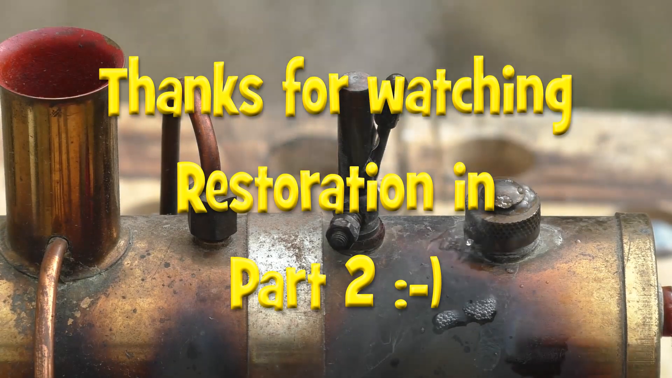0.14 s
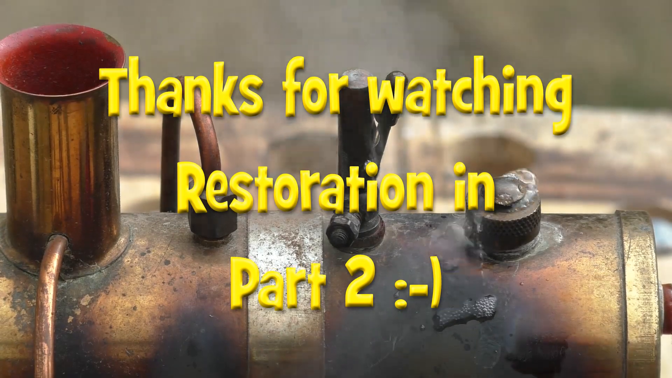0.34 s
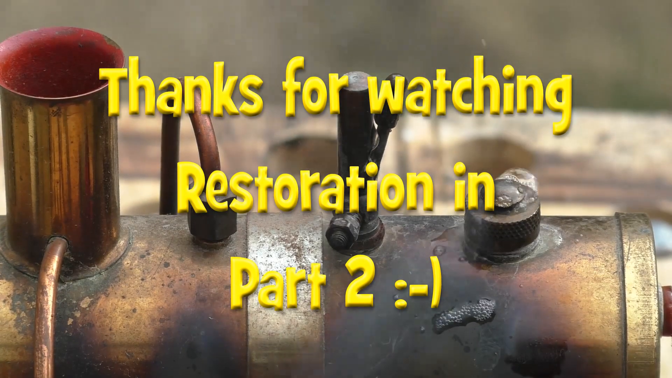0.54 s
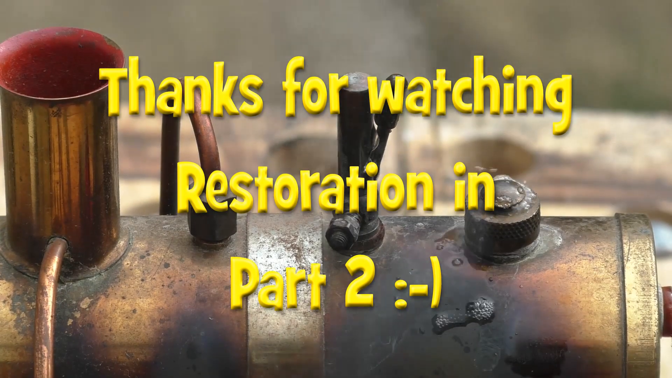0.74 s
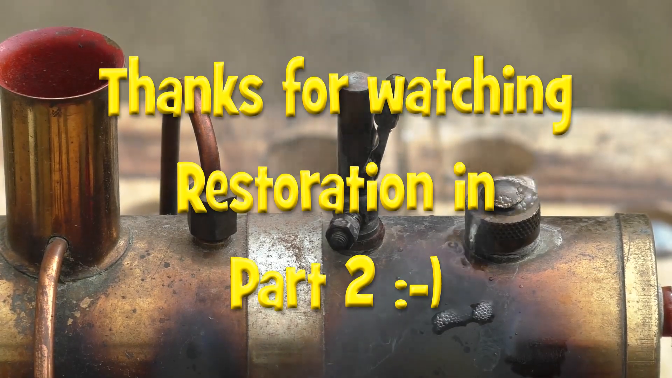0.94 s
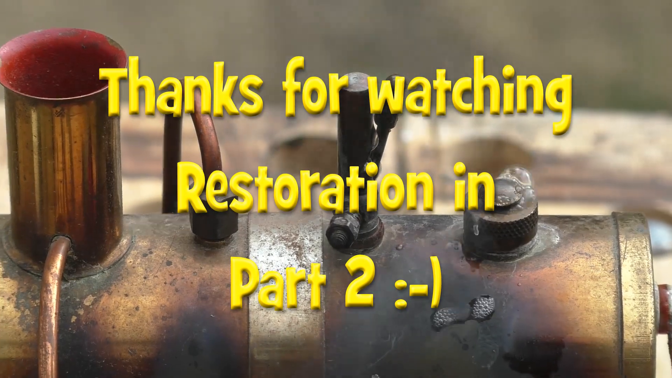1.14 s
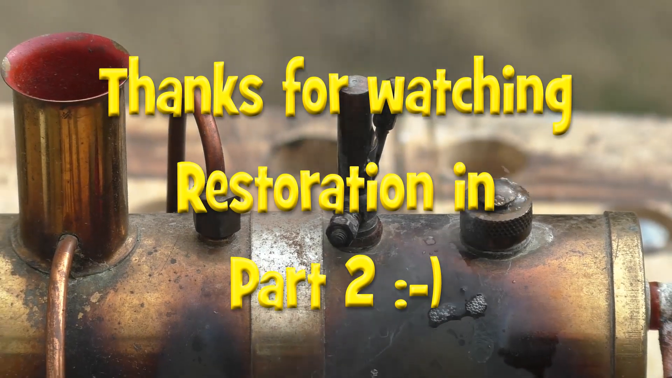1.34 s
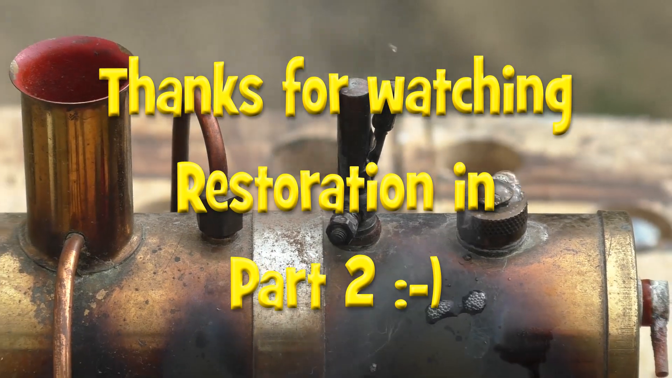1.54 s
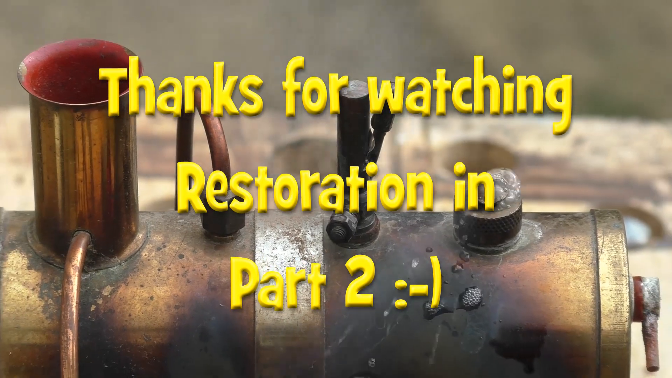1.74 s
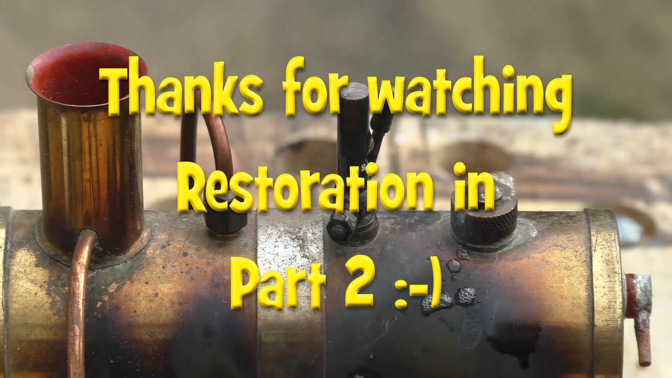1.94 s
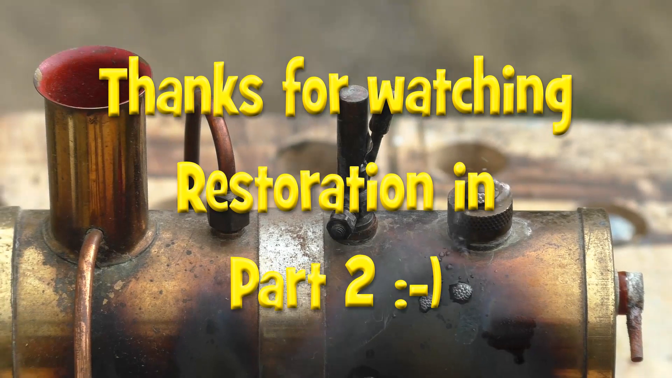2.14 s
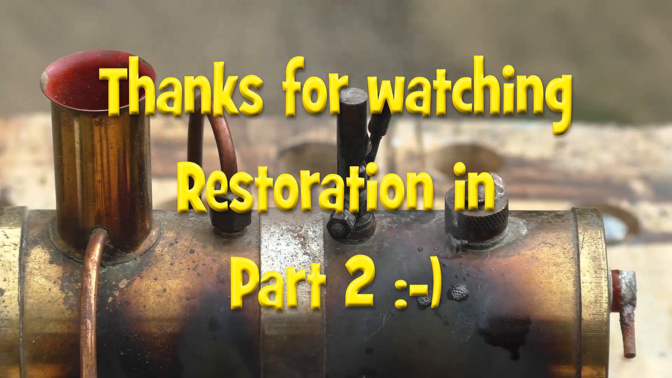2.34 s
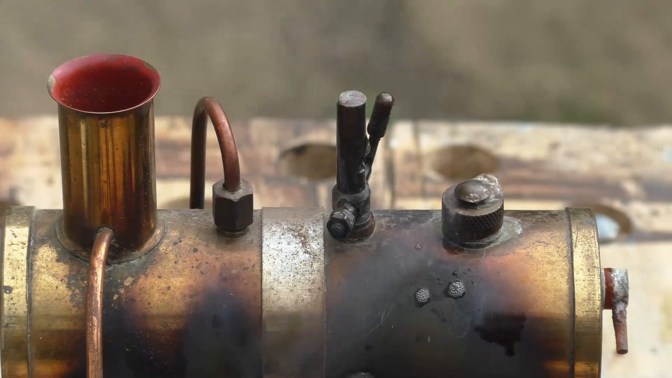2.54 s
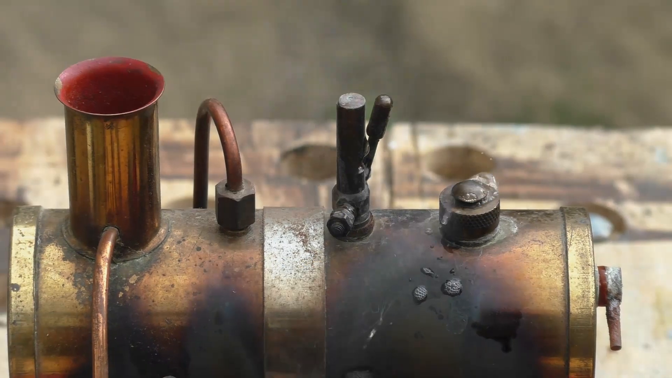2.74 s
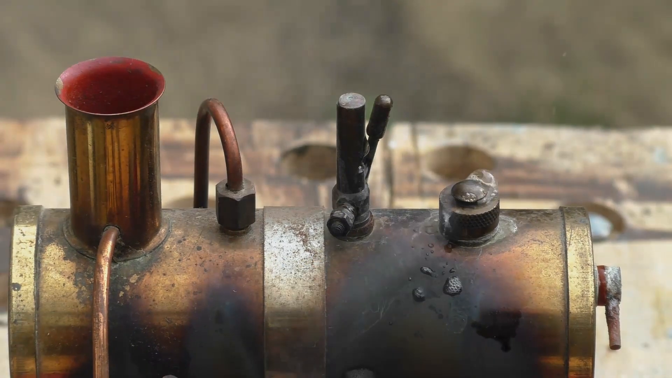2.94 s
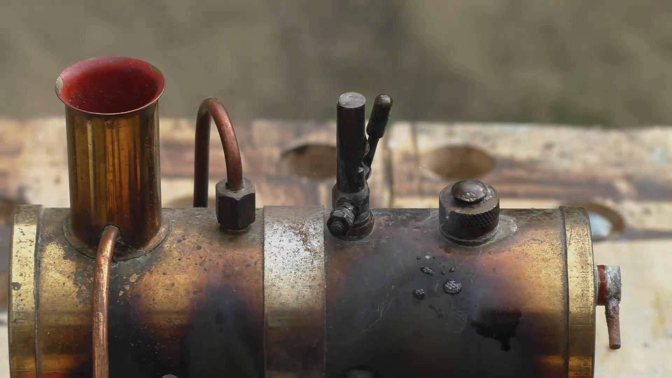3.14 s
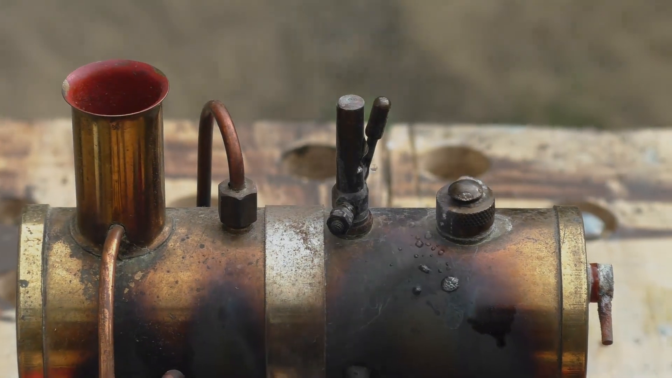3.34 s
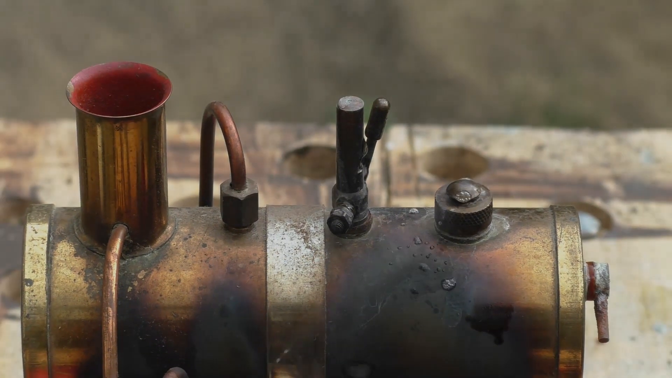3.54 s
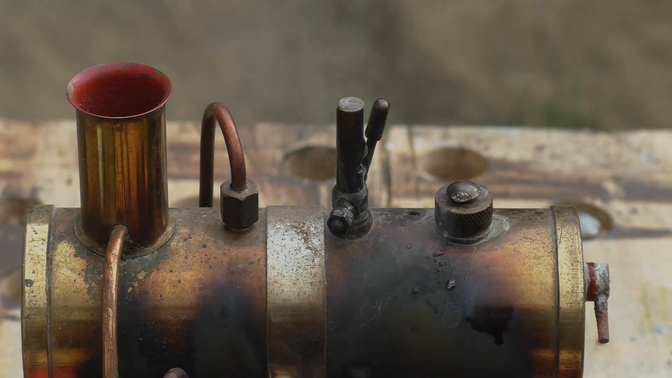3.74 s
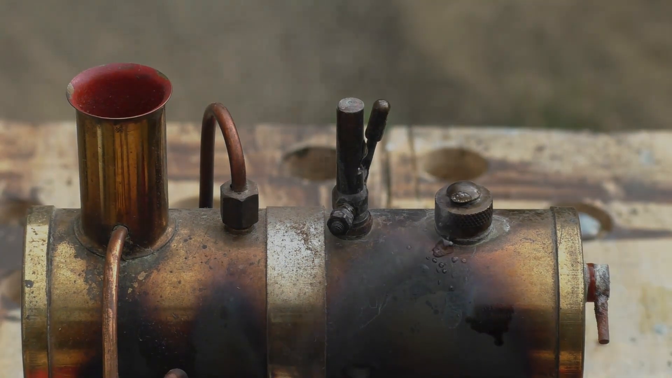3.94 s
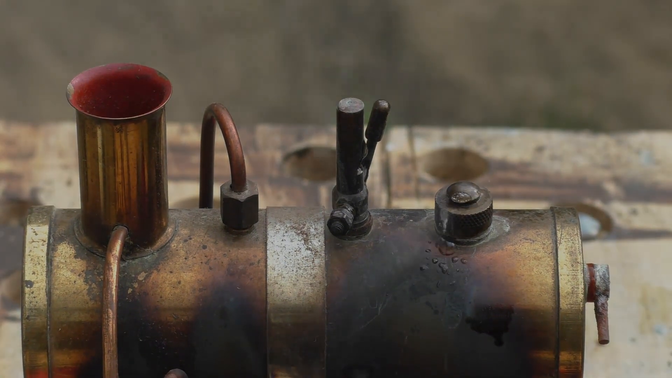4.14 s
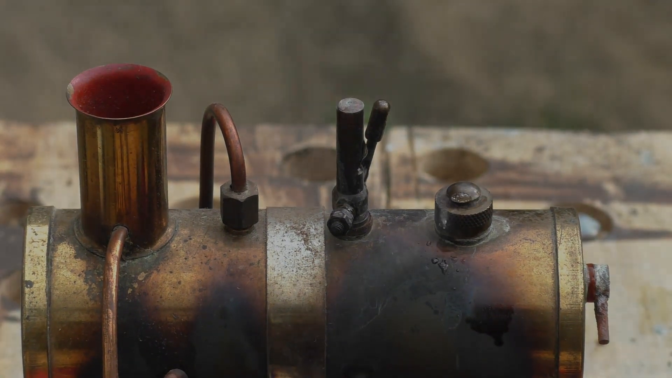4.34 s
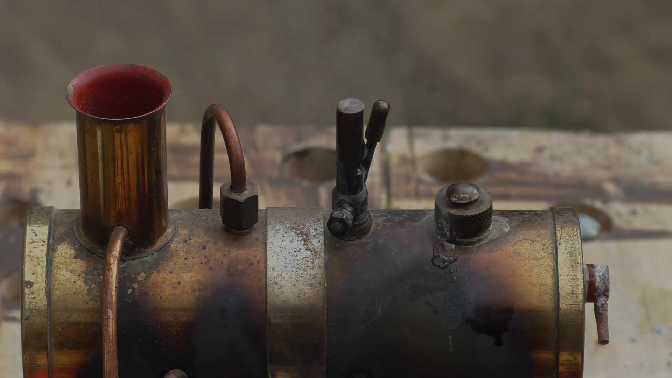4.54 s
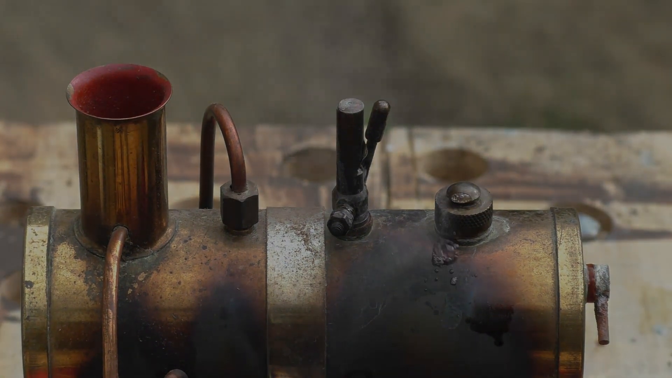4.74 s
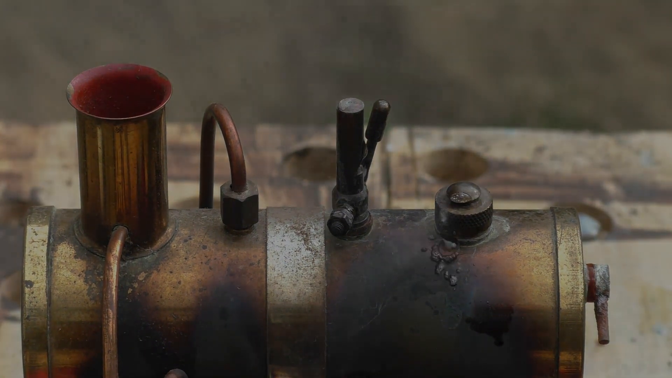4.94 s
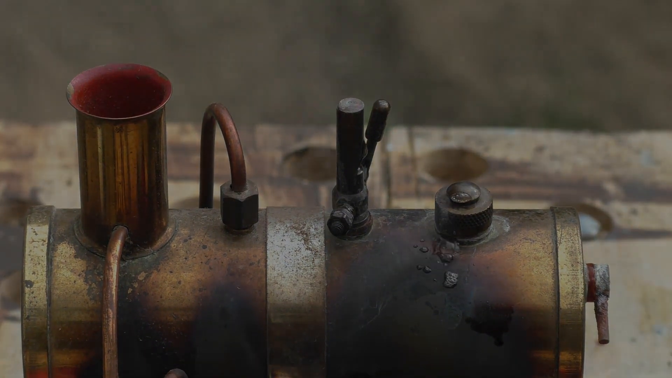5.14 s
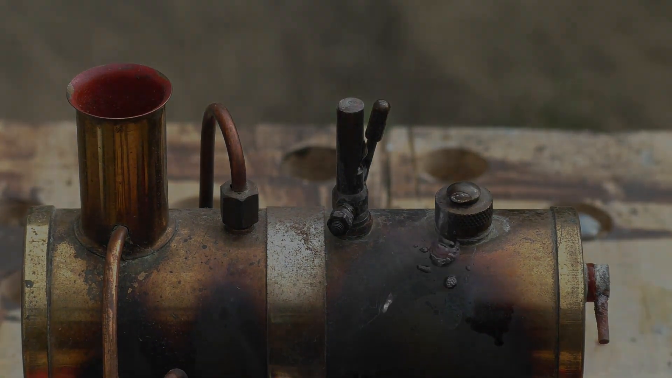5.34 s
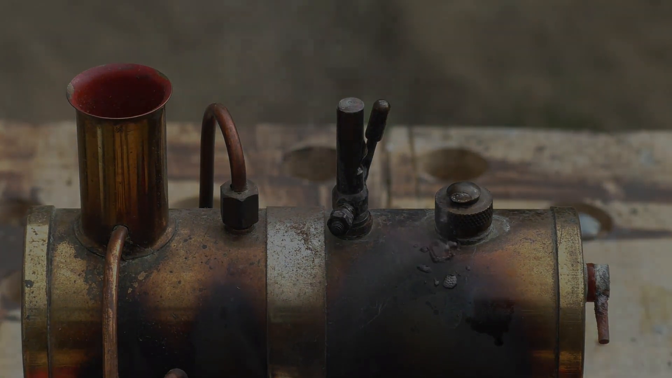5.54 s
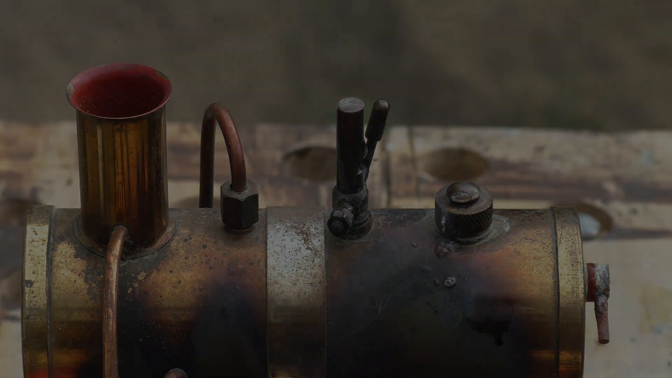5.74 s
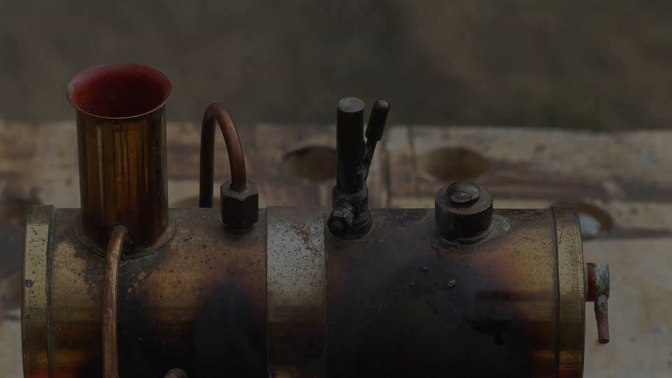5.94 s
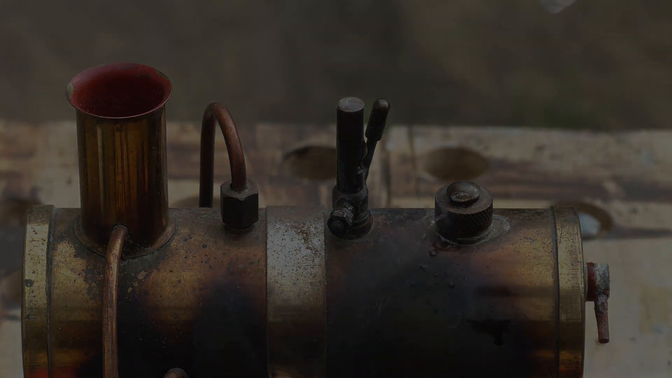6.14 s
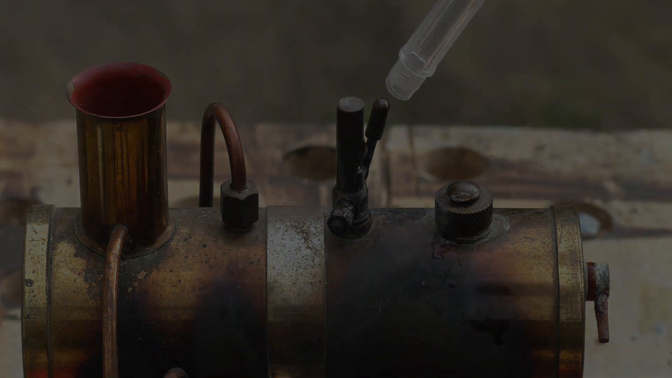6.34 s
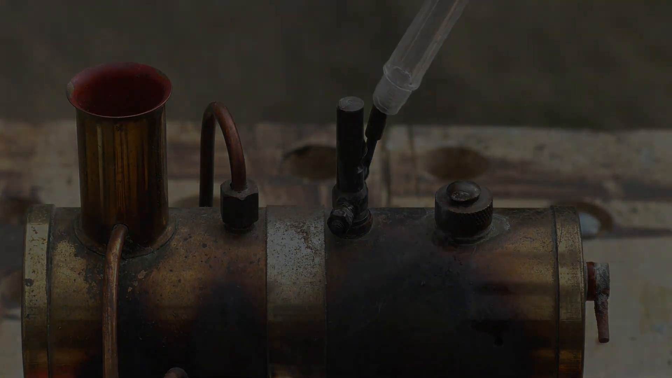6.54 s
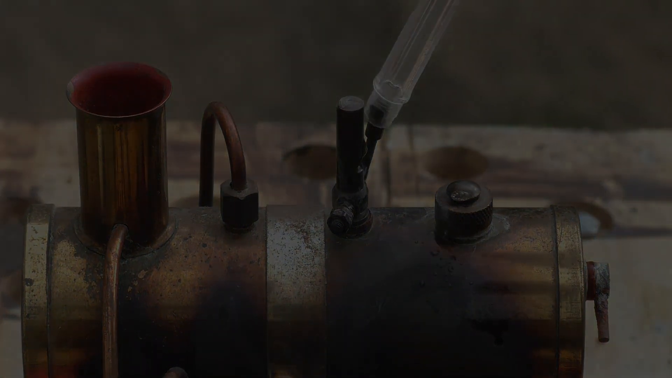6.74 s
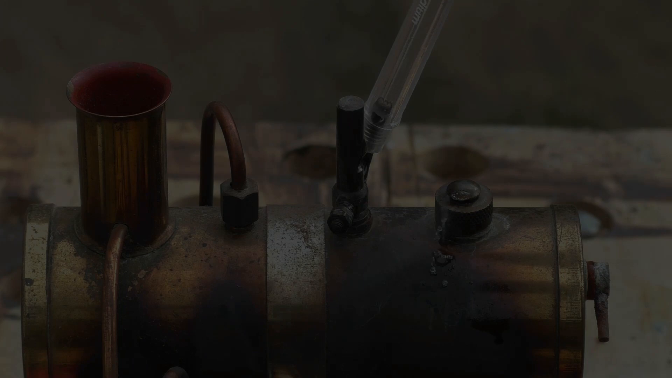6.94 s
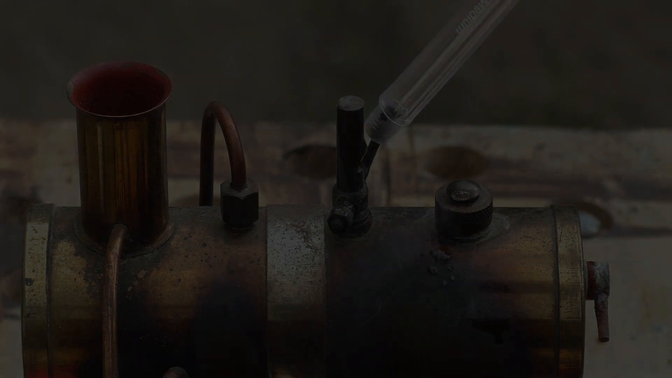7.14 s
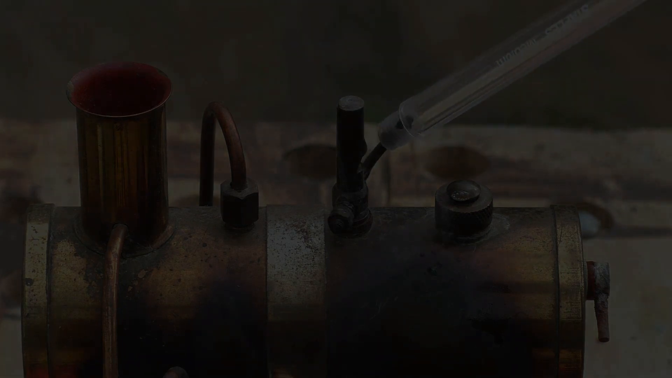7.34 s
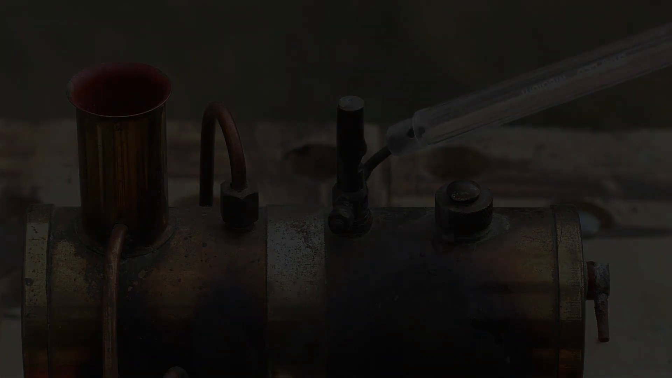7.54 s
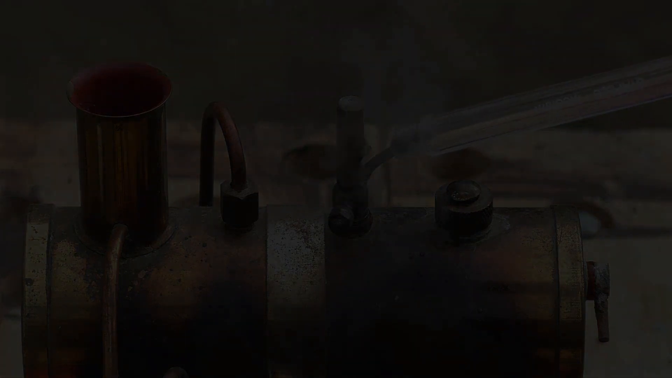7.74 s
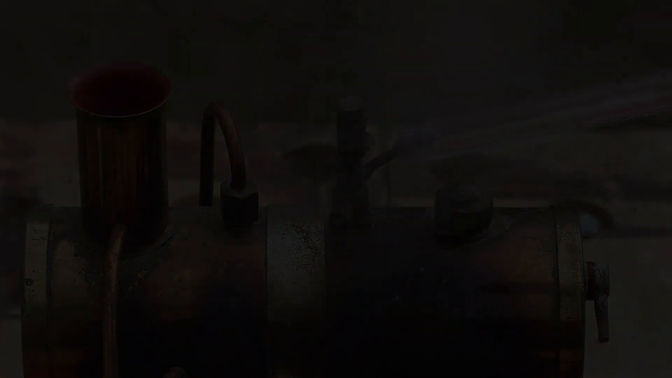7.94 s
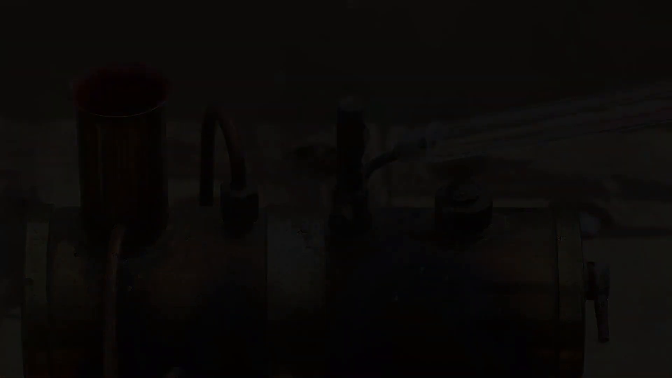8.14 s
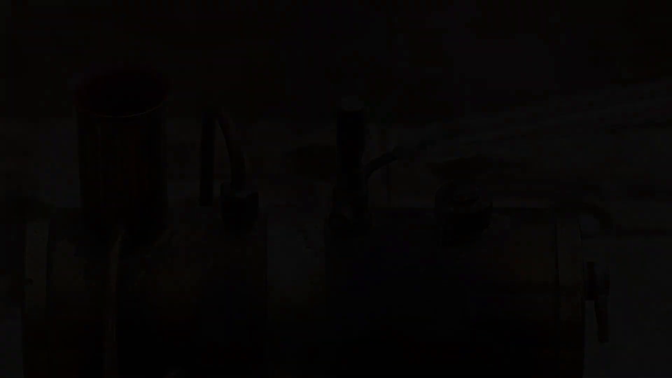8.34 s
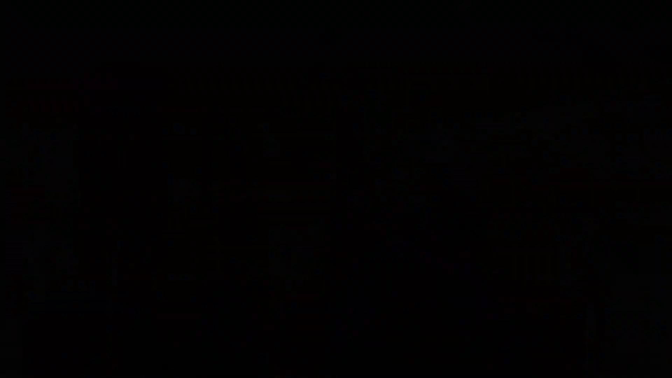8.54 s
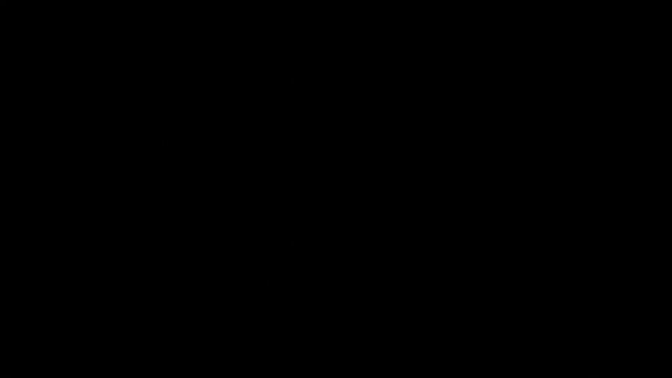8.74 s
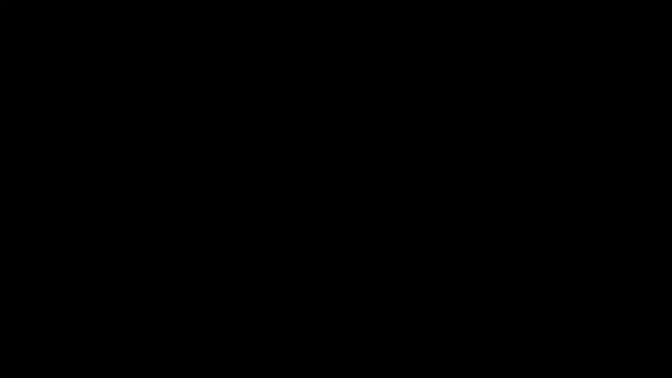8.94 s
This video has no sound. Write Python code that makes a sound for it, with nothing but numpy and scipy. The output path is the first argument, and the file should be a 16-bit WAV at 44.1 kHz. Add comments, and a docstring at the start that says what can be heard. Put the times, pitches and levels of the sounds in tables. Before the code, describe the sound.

Steam leaks from a toy boiler's filler cap with a steady, wet, spitting hiss, heard close over a faint low workshop rumble. Past the middle, a sleeve rustles softly, the hiss changes colour as a hand comes near, and a pen ticks and slips on a small lever. Near the end the valve spurts and a tiny steam whistle starts breathy, then holds one shrill, slightly wavering note while the hiss recedes.

```python
"""A wet, spitting hiss comes first: steam leaks at a toy boiler's filler cap, over a low workshop rumble.
A hand rustles near and colours the hiss by reflection; its pen ticks and slips on the whistle lever.
The valve spurts open and the pipe, breathy at first, oscillates on a shrill note shaken by turbulence.
An automatic gain control turns the whole sound down as the note grows, so the hiss recedes."""
import sys
import numpy as np
from scipy import signal
from scipy.fft import rfft, irfft, next_fast_len
from scipy.io import wavfile
from scipy.ndimage import uniform_filter1d

SR = 44100
rng = np.random.default_rng(int(sys.argv[2]) if len(sys.argv) > 2 else 0)


def generate_wav(sig):
    """Save sig (samples, or channels by samples) to the path in sys.argv[1] as 16-bit PCM at SR."""
    pcm = np.round(np.clip(np.atleast_2d(sig).T, -1, 1) * 32767).astype(np.int16)
    wavfile.write(sys.argv[1], SR, pcm)


N = 400412
SIZE, HOP = 1024, 512
TIME = np.arange(N) / SR
FRAME_S = np.arange(N // HOP + 5) * HOP / SR
BIN_HZ = np.fft.rfftfreq(SIZE, 1 / SR)

# stereo width: (frequency [Hz], side minus mid [dB])
STEREO_WIDTH = [(30, -15), (180, -19.5), (700, -25), (1400, -33.5), (2800, -73), (6000, -41), (6500, -3.5),
                (7500, -7.5), (9500, -5), (15000, -5)]
# stereo lean: (frequency [Hz], left minus right [dB])
STEREO_LEAN = [(6100, 0), (7200, -2), (8600, -1.5), (9600, 0), (13000, 2), (15500, 2)]
# spectrum of the leak: (frequency [Hz], relative level [dB])
LEAK_SPECTRUM = [(88, -64), (150, -22), (193, -7), (308, -14.5), (453, -9), (1290, -7.5), (1400, -8),
                 (1760, -3), (2450, -2.5), (5030, -3), (5650, -2), (7410, -6.5), (8490, -1.5),
                 (11100, -0.5), (15500, -5)]
# resonances of the cap and fittings: (frequency [Hz], width [Hz], gain [dB])
FITTING_MODES = [(189, 93, 4.5), (435, 37, 4.5), (633, 340, 3), (1402, 55, 8.5), (2135, 200, 5),
                 (2466, 43, 3.5), (3010, 51, 5), (3540, 36, 5.5), (3800, 39, 6), (4260, 69, 10),
                 (4733, 180, 4.5), (5446, 66, 10.5), (5640, 66, 7.5), (5850, 76, 8), (6750, 83, 5),
                 (6900, 60, 1), (7250, 76, 6), (8670, 1330, 3.5), (11080, 1100, 3), (13500, 860, 5),
                 (14800, 700, 5)]
# interference with the bench reflection: (frequency [Hz], width [Hz], gain [dB])
BENCH_NOTCHES = [(305, 96, -1), (857, 60, -2.5), (1270, 260, -3), (1756, 61, -11.5), (2695, 230, -1.5),
                 (3496, 96, -3), (4840, 98, -5.5), (6120, 170, 1), (6650, 104, -8.5), (7730, 600, -2.5),
                 (12400, 530, -2.5)]
# resonant colour of the hiss: (frequency [Hz], width [Hz], gain under the cupped hand [dB])
HISS_RESONANCES = [(400, 330, 1), (1680, 500, 2), (2144, 270, -7.5), (2628, 440, 8.5), (4000, 250, 3.5),
                   (4920, 650, 2), (5500, 500, -2.5), (6760, 710, 5), (7950, 620, 4), (12200, 1100, 3.5)]
# water chokes the leak, then blows clear: (time [s], depth [dB])
WATER_CHOKES = [(2.55, 2.8), (3.02, 0.7), (3.49, 0.3), (3.8, 0.2), (4.29, 0.7), (4.7, 0.5), (5.12, 2),
                (5.43, 1), (5.78, -0.6), (6.23, 1), (7.4, 0.5), (7.7, 1.7)]
# bubbles excite a cap resonance: (time [s], gain [dB])
BUBBLE_SPUTTERS = [(2.43, 4.5), (3.05, 4), (4.02, 1), (4.55, 2.5), (5.14, 5.5)]
# low workshop noise: (frequency [Hz], relative level [dB])
RUMBLE_SPECTRUM = [(20, -24), (40, -21), (65, -7), (100, 1), (140, -17), (250, -12), (600, -43)]
# reflection off the hand: (time [s], extra path [m])
ECHO_PATH = [(5.3, .65), (5.85, .41), (6.02, .275), (6.28, .2), (6.58, .189), (7.3, .207), (7.8, .211)]
# spectrum of the sleeve: (frequency [Hz], relative level [dB])
RUSTLE_SPECTRUM = [(100, -32), (220, -3), (380, 3.5), (650, 1.5), (1100, -1), (1400, -11), (2500, -10),
                   (8000, -24)]
# hand and sleeve movements: (time [s], level [dB], duration [s])
SLEEVE_MOVES = [(5.55, -45, 0.2), (5.79, -43, 0.19), (6.21, -32.5, 0.067), (6.36, -41.5, 0.68),
                (6.93, -40, 0.46), (7.5, -47.5, 0.94)]
# hand bumps and pen ticks: (time [s], level [dB], frequency [Hz], 60 dB decay time [s])
IMPACTS = [(5.784, -30, 270, 0.055), (6.175, -20.5, 2120, .015), (6.196, -25, 420, 0.024),
           (6.207, -34, 1950, .015), (6.217, -21, 1910, 0.029), (6.225, -29, 424, 0.016),
           (6.721, -20, 1440, 0.019), (6.738, -17, 2730, 0.011)]
# resonances of the pen barrel: (frequency [Hz], width [Hz], relative level [dB])
PEN_MODES = [(1180, 170, -2), (1870, 290, -3), (3200, 390, -1), (4550, 820, 3), (6100, 570, 1)]
# the pen slips on the lever: (time [s], level [dB], duration [s])
PEN_SLIPS = [(6.172, -28.5, .025), (6.215, -26.5, 0.064), (6.724, -32, .04)]
# steam through the valve, which seeps, cracks and opens: (time [s], level [dB])
VALVE_FLOW = [(6.9, -52), (7.55, -33.5), (7.74, -29.5), (7.8, -24), (7.93, -15.5), (9.08, -10.5)]
# whistle body resonances: (frequency [Hz], width [Hz], level barely open [dB], level fully open [dB])
BODY_MODES = [(450, 670, -22.5, -18), (930, 440, -25, -18), (1570, 350, -18, -12.5), (2550, 820, -7, -7.5),
              (3720, 350, -4.5, -5), (4910, 670, 0.5, 1), (5550, 700, -6, -8), (8350, 1400, -9, -1),
              (10400, 860, -11, -4), (12500, 1300, -14, -5.5), (15000, 1200, -11, -8)]
# spurts from the valve: (time [s], level [dB], duration [s])
VALVE_PUFFS = [(7.645, -30, .05), (7.80, -20.5, 0.04), (7.91, -23, 0.045)]
# the note scoops up as it takes hold: (time [s], frequency [Hz])
NOTE_PITCH = [(7.9, 6200), (8.06, 6275), (8.13, 6420), (8.22, 6515), (8.49, 6415), (8.56, 6495),
              (8.75, 6460), (9.02, 6490), (9.08, 6590)]

# the hand comes into reach, then the palm closes over the boiler: (start [s], duration [s])
REACH, CUP = (5.25, 0.58), (6.12, 1)
# the pipe starts to resound, then the note takes hold: (start [s], duration [s])
RESOUND, TAKE_HOLD = (7.73, 0.31), (7.92, 0.23)


def gain_of(db):
    """Amplitude ratio of a level in decibels."""
    return 10 ** (np.asarray(db) / 20)


def unit_rms(x):
    """Normalisation to an rms of one."""
    return x / np.sqrt(np.mean(x ** 2) + 1e-20)


def unit_power(shape):
    """Normalisation of a filter so that white noise keeps its power."""
    return shape / np.sqrt(np.mean(shape ** 2, -1, keepdims=True))


def curve(rows, t):
    """Linear interpolation of a table at the times t."""
    return np.interp(t, *np.transpose(rows))


def spectrum(rows):
    """Interpolation of a table onto the bins, along log frequency."""
    hz, db = np.transpose(rows)
    return np.interp(np.log(BIN_HZ + 1), np.log(hz), db)


def bell(hz, width):
    """Resonance curve of height one."""
    return 1 / (1 + ((BIN_HZ - hz) / (0.71 * width)) ** 2) ** 2


def response_db(modes):
    """Filters in series: their peaks and dips add in decibels."""
    return sum(db * bell(hz, width) for hz, width, db in modes)


def ramp(t, start, length):
    """Linear transition from 0 to 1."""
    return np.clip((t - start) / length, 0, 1)


def swell(t, peak, rise, fall):
    """Asymmetric Gaussian envelope of height one."""
    return np.exp(-((t - peak) / np.where(t < peak, rise, fall)) ** 2)


def strokes(rows):
    """Incoherent addition: strokes that rise quickly and die more slowly sum in power."""
    envelopes = (gain_of(db) * swell(TIME, s, .3 * length, .7 * length) for s, db, length in rows)
    return np.sqrt(sum(envelope ** 2 for envelope in envelopes))


def wander(rate_hz, count=N, step=1 / SR):
    """Random fluctuation of rms one, low-passed at rate_hz."""
    size = next_fast_len(count)
    hz = np.fft.rfftfreq(size, step)
    smoothed = rfft(rng.standard_normal(size)) / (1 + (hz / rate_hz) ** 2)
    return unit_rms(irfft(smoothed, size)[:count])


def noise(gains, spit=0., clicks_per_s=900):
    """Source and filter: stereo noise, with clicks of relative rms spit, is shaped bin by bin."""
    count = (len(FRAME_S) - 1) * HOP
    white = rng.standard_normal((2, count))
    if spit:
        sizes = gain_of(4 * np.minimum(rng.exponential(1, count), 3))
        clicks = sizes * (rng.random(count) < clicks_per_s / SR)
        white = unit_rms(white + spit * unit_rms(clicks * np.sign(white)))
    mid, side = signal.stft(white, nperseg=SIZE, noverlap=SIZE - HOP)[2].transpose(0, 2, 1)
    side = side * gain_of(spectrum(STEREO_WIDTH))
    lean = gain_of(spectrum(STEREO_LEAN) / 2)
    frames = np.array([(mid + side) * lean, (mid - side) / lean]) * gains
    return signal.istft(frames.transpose(0, 2, 1), nperseg=SIZE, noverlap=SIZE - HOP)[1][:, :N]


def room(x, t60=0.3):
    """Reverberation: sparse reflections, independent in each channel, decay exponentially."""
    t = np.arange(SR // 2) / SR
    taps = rng.standard_normal((2, len(t))) * (rng.random((2, len(t))) < 2500 / SR)
    taps *= gain_of(-60 * t / t60) * (t > .002)
    taps /= np.linalg.norm(taps, axis=1, keepdims=True)
    return signal.fftconvolve(x[None], taps, axes=1)[:, :N]


def leak_drive_db(sag_db_per_s=0.22, surge_db=2.8):
    """Jet strength follows pressure: a slow sag, chokes of water and one surge."""
    choked_db = sum(db * swell(FRAME_S, s, rise=0.12, fall=0.07) for s, db in WATER_CHOKES)
    surge = swell(FRAME_S, 6.98, rise=0.37, fall=0.19)
    return -23.5 - sag_db_per_s * FRAME_S - choked_db + surge_db * surge


def leak(ripple_db=1.1, flicker_db=0.64, patchy_db=0.9, sputter_db=1.3):
    """Turbulent jet noise: wet steam excites the cap's resonances; its treble follows pressure most."""
    walls_db = ripple_db * unit_rms(rng.standard_normal(len(BIN_HZ))) / (1 + (BIN_HZ / 9000) ** 2)
    colour_db = spectrum(LEAK_SPECTRUM) + response_db(FITTING_MODES + BENCH_NOTCHES) + walls_db
    low_db, high_db = [sputter_db * wander(19, len(FRAME_S), HOP / SR) for _ in range(2)]
    low_db += sum(db * swell(FRAME_S, s, rise=0.06, fall=0.06) for s, db in BUBBLE_SPUTTERS)
    cap_db = np.outer(low_db, bell(2320, 500)) + np.outer(high_db, bell(4090, 420))
    drive_db = leak_drive_db()
    swing_db = drive_db - drive_db.mean() + flicker_db * wander(9.3, len(FRAME_S), HOP / SR)
    treble_share = np.interp(BIN_HZ, [2000, 9000], [0.079, 1])
    patches = rng.standard_normal((len(FRAME_S), len(BIN_HZ)))  # water keeps changing the jet
    patches = unit_rms(uniform_filter1d(uniform_filter1d(patches, size=13, axis=0), size=36, axis=1))
    unsteady_db = treble_share * (swing_db[:, None] + patchy_db * patches)
    level_db = drive_db.mean() + cap_db + resonant_colour_db() + unsteady_db
    return noise(unit_power(gain_of(colour_db)) * gain_of(level_db) * hand_reflection(), spit=0.36)


def resonant_colour_db(start_share=0.46, palm_db=4.5):
    """Resonance: the hiss's colour grows stronger as the hand cups over it; the palm adds a mode."""
    cupped = ramp(FRAME_S, *CUP)[:, None]
    share = start_share + (1 - start_share) * cupped
    return share * response_db(HISS_RESONANCES) + cupped ** 2 * palm_db * bell(2430, 190)


def workshop(rumble_db=-56, hum_db=-57, hum_hz=106.6, sag_hz_per_s=4, peak_s=2.5):
    """Slow modulation: a rumble heaves unevenly; a faint hum swells and fades as its pitch sinks."""
    hz = hum_hz - sag_hz_per_s * (TIME - peak_s) + 1.37 * wander(8.6)
    envelope = np.sqrt(2) * gain_of(hum_db) * swell(TIME, peak_s, rise=1.9, fall=0.9)
    hum = envelope * np.sin(2 * np.pi * np.cumsum(hz) / SR)
    rumble = gain_of(rumble_db + 2 * wander(11)) * noise(unit_power(gain_of(spectrum(RUMBLE_SPECTRUM))))
    return hum + rumble


def hand_reflection(closest_echo=0.3, gap_db=2.4, sound_m_per_s=343):
    """Comb filtering: echoes off the hand interfere with the direct hiss, and the air gap resonates."""
    path_m = curve(ECHO_PATH, FRAME_S)[:, None]
    near = ramp(FRAME_S, *REACH)[:, None]
    uncupped = 1 - ramp(FRAME_S, *CUP)[:, None]
    strength = closest_echo * near * path_m.min() / path_m
    lag = -2j * np.pi * BIN_HZ * path_m / sound_m_per_s
    echo = np.exp(lag) + 0.5 * np.exp(0.746 * lag)  # the fingers give a shorter path
    echo /= 1 + (BIN_HZ / 9000) ** 8  # soft skin reflects little high treble
    echo *= 1 + 0.25 * bell(430, 1000)  # the forearm reflects longer waves
    gap_mode = bell(sound_m_per_s / path_m, 150)  # one wavelength per echo path
    return gain_of(gap_db * near * uncupped * gap_mode) * abs(1 + strength * echo)


def sleeve_rustle():
    """Friction noise: cloth rubs with each movement of the hand."""
    return noise(unit_power(gain_of(spectrum(RUSTLE_SPECTRUM)))) * strokes(SLEEVE_MOVES)


def ticks(reverb_db=-7):
    """Damped free vibration: each impact of hand or pen rings with a burst of noise."""
    hits, t = np.zeros(N), np.arange(SR // 10) / SR
    for s, db, hz, t60 in IMPACTS:
        contact = signal.lfilter([.5], [1, -.6], rng.standard_normal(len(t)))
        ring = np.sin(2 * np.pi * hz * t) + .4 * contact
        hits[round(s * SR):][:len(t)] += gain_of(db - 60 * t / t60) * ring
    return hits + gain_of(reverb_db) * room(hits)[0]


def pen_scrape():
    """Sliding friction: uneven slips on the lever excite the pen barrel's modes."""
    power = sum(gain_of(db) ** 2 * bell(hz, width) for hz, width, db in PEN_MODES)
    return noise(unit_power(np.sqrt(power)), spit=1) * strokes(PEN_SLIPS)


def valve_jet(loss_to_note_db=4.5):
    """Forced resonance: steam rushes through the whistle body, brighter as the valve opens."""
    opening = ramp(FRAME_S, *TAKE_HOLD)[:, None]
    power = sum(gain_of(shut_db + opening * (open_db - shut_db)) ** 2 * bell(hz, width)
                for hz, width, shut_db, open_db in BODY_MODES)
    high_pass = 1 - 1 / (1 + (BIN_HZ / 200) ** 4)  # a small opening radiates no bass
    level_db = curve(VALVE_FLOW, TIME) - loss_to_note_db * ramp(TIME, *TAKE_HOLD)
    return noise(unit_power(high_pass * np.sqrt(power))) * gain_of(level_db)


def pipe_breath(wide_hz=850, narrow_hz=310, sharp_hz=70, early_db=-5, late_db=6.5):
    """Pipe resonance: a band of noise just above the note narrows and grows as the pipe resounds."""
    pitch = curve(NOTE_PITCH, FRAME_S)[:, None]
    width = wide_hz + (narrow_hz - wide_hz) * ramp(FRAME_S, *RESOUND)[:, None]
    skirt = 1 / (1 + ((BIN_HZ - pitch) / 950) ** 4)
    level_db = curve(VALVE_FLOW, TIME) + early_db + (late_db - early_db) * ramp(TIME, *RESOUND)
    return noise(unit_power(np.sqrt(bell(pitch + sharp_hz, width)) * skirt)) * gain_of(level_db)


def valve_puffs():
    """Transient excitation: spurts of wet steam ring the whistle body as the valve cracks open."""
    return noise(unit_power(bell(hz=5050, width=890))) * strokes(VALVE_PUFFS)


def whistle_note(start_s=7.88, build_s=0.13, best_hz=6478, waver_hz=27, jitter_hz=18):
    """Self-sustained oscillation: the pipe's tone builds while turbulence shakes pitch and strength."""
    hz = curve(NOTE_PITCH, TIME) + waver_hz * wander(14)
    onset = np.exp(-np.maximum(TIME - start_s, 0) / build_s)  # falls to zero as the note settles
    detuning_db = 0.1 * np.maximum(hz - best_hz, 0)  # blown sharp, the pipe speaks more weakly
    level_db = curve(VALVE_FLOW, TIME) + 18 - 24 * onset - detuning_db
    phase = 2 * np.pi * np.cumsum(hz + jitter_hz * wander(69.3)) / SR
    flutter = 1 + (.08 + .4 * onset) * wander(92)
    envelope = np.sqrt(2) * ramp(TIME, start_s, 0.071) * gain_of(level_db) * flutter
    tone = envelope * np.sin([phase, phase - 0.97])  # the right channel lags
    return tone * gain_of([[1.6], [-2.5]]) + room(tone[0]) * gain_of([[-19], [-9]])


def scene():
    """Superposition: the pressures of all sources add in two channels."""
    handling = sleeve_rustle() + ticks() + pen_scrape()
    whistle = valve_jet() + pipe_breath() + valve_puffs() + whistle_note()
    return leak() + workshop() + handling + whistle


def record(dry, threshold_db=-20, slope=0.8, attack_s=0.033, recover_db_per_s=6, cutoff_hz=15790):
    """Automatic gain control: gain falls quickly and recovers slowly; a low-pass limits the band."""
    power_db = 10 * np.log10(abs(uniform_filter1d((dry ** 2).mean(0), size=1500)) + 1e-12)
    recovery_db = TIME * recover_db_per_s
    held_db = np.maximum.accumulate(power_db + recovery_db) - recovery_db
    over_db = np.maximum(held_db - threshold_db, 0)
    pole = np.exp(-1 / (attack_s * SR))
    ducked = dry / gain_of(slope * signal.lfilter([1 - pole], [1, -pole], over_db))
    low_pass = signal.firwin(1023, cutoff_hz, window=("kaiser", 9), fs=SR)
    return signal.oaconvolve(ducked, low_pass[None], "same")


dry = scene()
out = record(dry)
generate_wav(out)
```